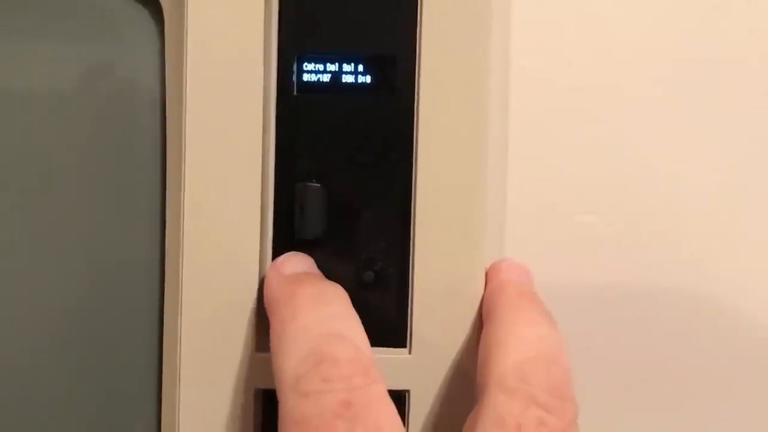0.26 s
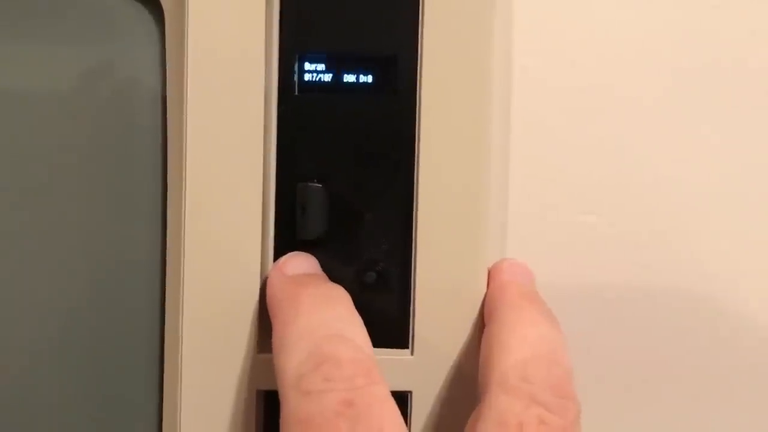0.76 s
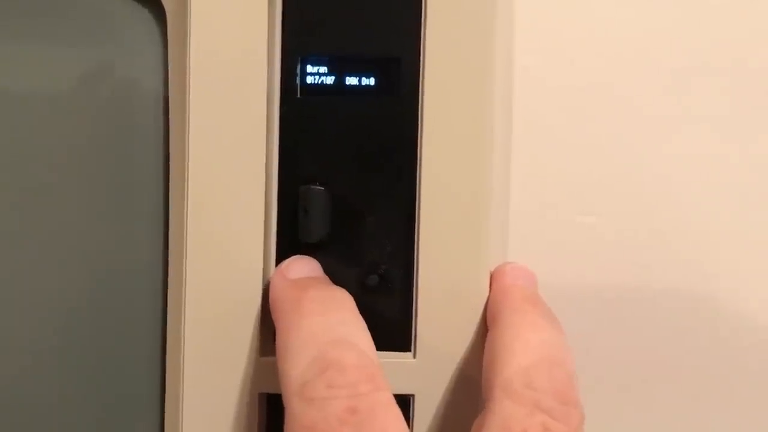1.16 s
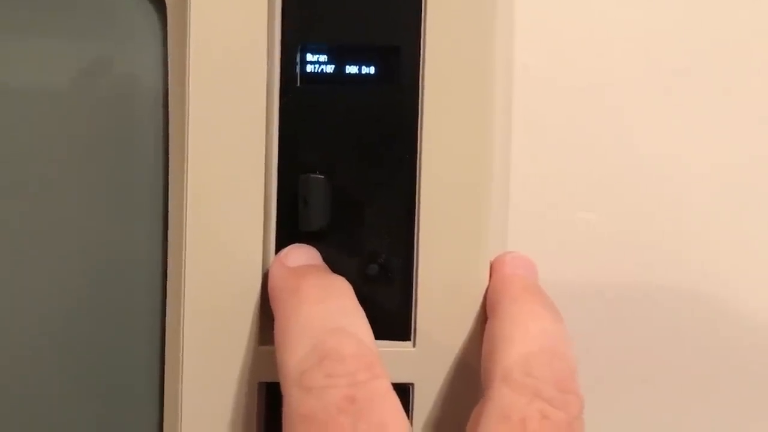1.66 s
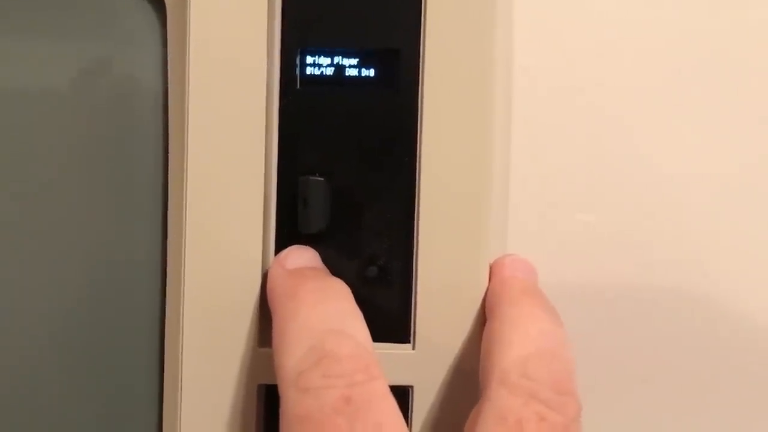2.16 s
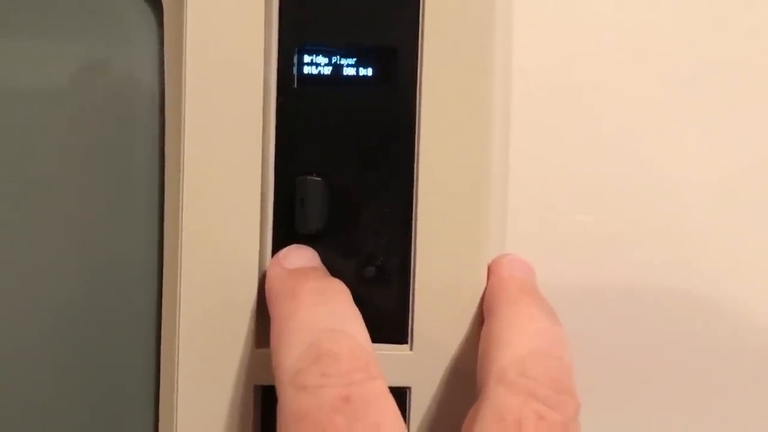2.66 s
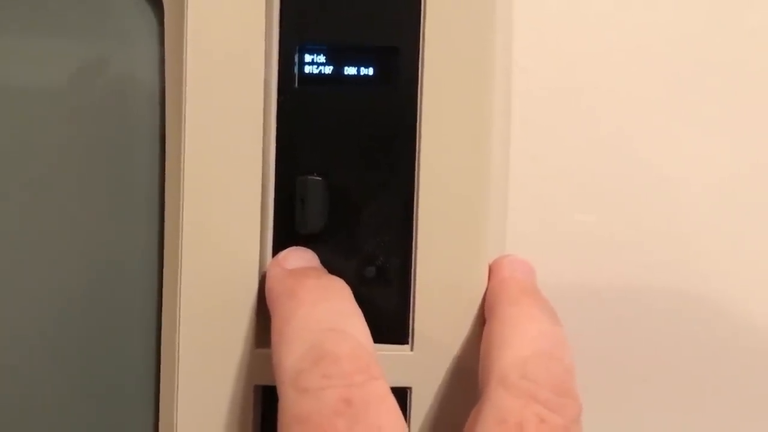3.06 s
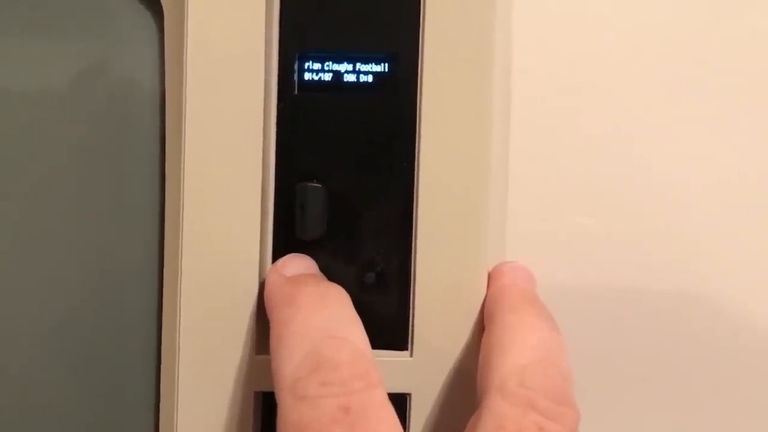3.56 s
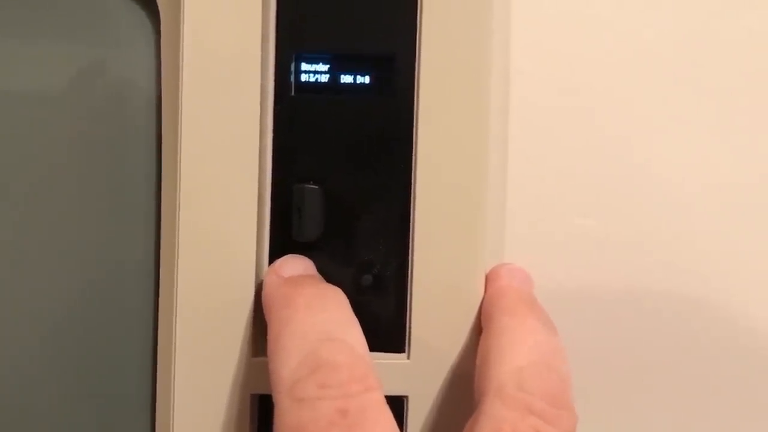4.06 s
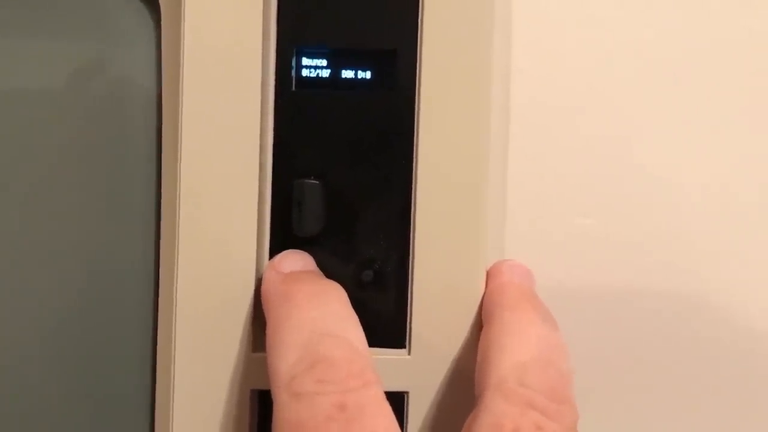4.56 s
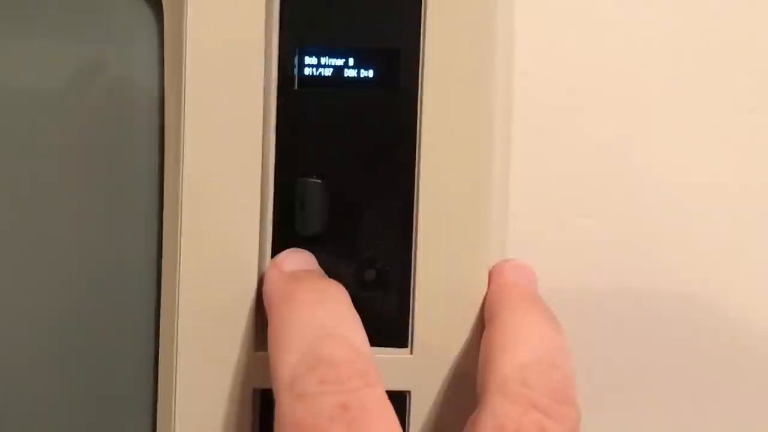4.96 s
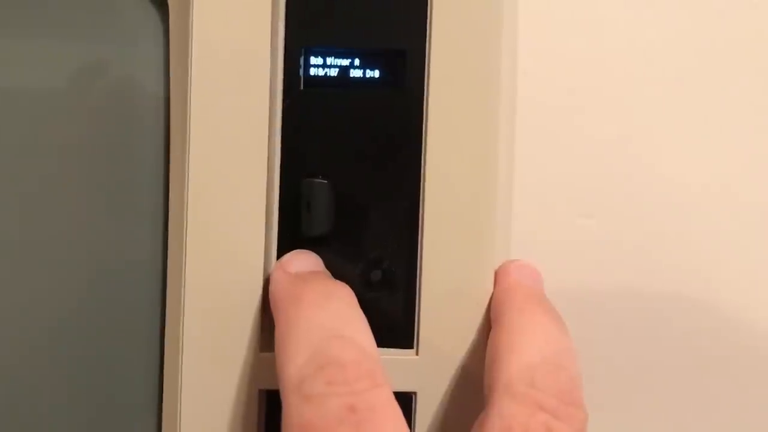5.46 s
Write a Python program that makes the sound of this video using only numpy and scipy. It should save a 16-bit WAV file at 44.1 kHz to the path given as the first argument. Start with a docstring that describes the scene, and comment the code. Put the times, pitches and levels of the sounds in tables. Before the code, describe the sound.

A finger presses a small plastic push button on a computer drive panel about eleven times at a slightly uneven pace. Each press is a crisp snap with a short knock from the plastic case, and most are followed at once by a duller release click. The button is close to the microphone in a small room. A low hum, soft hiss and a picture tube's thin, very high whistle continue throughout.

```python
"""A small plastic push button on a drive panel clicks close up as a finger steps through a menu.
Each press and release snaps the switch and rings the plastic case; a small room answers.
Behind it sit a low hum, a soft hiss and the thin line whistle of a picture tube."""
import sys
import numpy as np
from scipy import signal
from scipy.fft import rfft, irfft
from scipy.io import wavfile
from scipy.ndimage import uniform_filter1d

SR = 44100
rng = np.random.default_rng(int(sys.argv[2]) if len(sys.argv) > 2 else 0)


def transcribe(u):
    """Save the signal u as a 16-bit wav file named by the first command-line argument.

    u: samples, shape (n,) or (channels, n), limited to [-1, 1]; the rate is SR.
    q: integer samples, one column per channel.
    """
    v = np.clip(np.atleast_2d(u).T, -1, 1)
    q = np.round(v * 32767).astype(np.int16)
    wavfile.write(sys.argv[1], SR, q)


N = 251811
T = np.arange(N) / SR


def undb(db):
    """Decibels to gain."""
    return 10 ** (np.asarray(db) / 20)


def unit(x):
    """Scale to rms 1."""
    return x / np.sqrt(np.mean(x ** 2))


def equalise(x, curve):
    """Minimum-phase EQ through (frequency [Hz], gain [dB]) points."""
    size = 8192
    hz, db = np.transpose(curve)
    log_hz = np.log(np.fft.rfftfreq(size, 1 / SR) + 1)
    log_gain = np.log(undb(np.interp(log_hz, np.log(hz), db)))
    cepstrum = irfft(log_gain)[:size // 2]
    cepstrum[0] /= 2
    impulse = irfft(np.exp(rfft(2 * cepstrum, size)))
    return signal.fftconvolve(x, impulse)[:len(x)]


def wander(rate_hz):
    """Random modulator: sample and hold, smoothed twice, at rms 1."""
    hold = int(SR / rate_hz)
    steps = np.repeat(rng.standard_normal(N // hold + 1), hold)
    return unit(uniform_filter1d(uniform_filter1d(steps, hold), hold)[:N])


def bump(at_s, width_s):
    """A smooth rise to 1 and fall around a moment."""
    return np.exp(-((T - at_s) / width_s) ** 2)


def decay(t, t60):
    """Exponential decay, 60 dB in t60 seconds."""
    return np.exp(-np.log(1000) * t / t60)


def ring(t, hz, t60, db):
    """Struck modes; neighbours swing in opposite senses, so the sound swells over its first cycles."""
    t = np.maximum(t, 0)[:, None]
    gains = undb(db) * (-1) ** np.arange(len(hz))
    return (np.sin(2 * np.pi * hz * t) * decay(t, t60)) @ gains


def drifting_tone(hz, db, drift_rad=0.32):
    """A sine whose phase wanders gently."""
    return np.sqrt(2) * undb(db) * np.sin(2 * np.pi * hz * T + drift_rad * wander(4.7))


# Colour of the noise floor: (frequency [Hz], gain [dB])
HISS_EQ = [(100, -11.5), (240, 6), (330, 1.5), (500, -3.5), (1000, -2.5), (1500, -7.5), (2300, -16.5),
           (3200, -12), (5500, -18.5), (9400, -21.5), (12500, -17), (14000, -38)]


def hiss(level_db=-54, waver_db=0.16):
    """A soft, nearly even bed of noise."""
    noise = unit(equalise(rng.standard_normal(N), HISS_EQ))
    return noise * undb(level_db - waver_db * wander(3.2))


# Colour of the low hum: (frequency [Hz], gain [dB])
RUMBLE_EQ = [(22, -34.5), (38, -22.5), (58, -2), (70, -7), (83, 2.5), (98, -10.5), (118, -4.5), (138, -5.5),
             (170, -9), (200, -22), (300, -37.5), (900, -87)]


def rumble(level_db=-43.5, swell_db=3):
    """A low, noisy hum with one broad, shallow swell."""
    noise = unit(equalise(rng.standard_normal(N), RUMBLE_EQ))
    return noise * undb(level_db + swell_db * bump(at_s=1.08, width_s=0.53))


# The drive's hum, then two faint partners of the tube's whistle: (frequency [Hz], level [dB])
STEADY_TONES = [(83, -53.5), (7825, -77.5), (11725, -68)]


def steady_tones():
    """The drive hums and the tube whines faintly, each tone wavering by about a decibel."""
    return sum(drifting_tone(hz, db + wander(3.75)) for hz, db in STEADY_TONES)


# Moments when the whistle ducks and comes back: (time [s], half width [s], depth [dB])
WHISTLE_DUCKS = [(1.75, 1, 2.5), (3.62, 0.19, 5), (4.1, 0.18, 8)]


def tube_whistle(line_hz=15625, level_db=-40, flutter_db=1.1):
    """The picture tube whistles at its line rate, with a slight flutter."""
    duck_db = sum(depth * bump(at_s, width_s) for at_s, width_s, depth in WHISTLE_DUCKS)
    return drifting_tone(line_hz, level_db + flutter_db * wander(30) - duck_db)


# Colour of the room's reflections: (frequency [Hz], gain [dB])
ROOM_EQ = [(120, -19), (245, -1), (320, 0), (430, -9), (560, -3.5), (720, -2.5), (1100, -6.5), (1600, -6.5),
           (3500, -6.5), (7000, -4.5), (10000, -8.5), (15000, -10)]


def room(x, wet_db=-9, early_t60=0.12, late_t60=0.35, late_db=-9, wall_hz=3500):
    """Dense reflections from the desk and nearby gear, then the fainter, duller tail of the walls."""
    t, predelay_s, build_s = T[:SR // 2], 0.009, 0.008
    build = 1 - np.exp(-np.maximum(t - predelay_s, 0) / build_s)
    diffuse = rng.standard_normal(len(t)) * build
    dull = signal.sosfilt(signal.butter(1, wall_hz, fs=SR, output="sos"), diffuse)
    echoes = diffuse * decay(t, early_t60) + undb(late_db) * dull * decay(t, late_t60)
    echoes = equalise(echoes / np.linalg.norm(echoes), ROOM_EQ)
    return undb(wet_db) * signal.fftconvolve(x, echoes)[:N]


# Bending modes of the plastic case: (frequency [Hz], t60 [s], press level [dB], release level [dB])
CASE_MODES = [(240.3, 0.087, -28.5, -29), (396.2, 0.052, -23.5, -24), (443.2, 0.038, -14, -14.5),
              (535, 0.016, -10, -10), (646.6, 0.019, -16.5, -15), (779, 0.11, -38, -35.5),
              (875, 0.038, -27, -24.5), (1035, 0.049, -36, -31), (1132, 0.045, -34.5, -30),
              (1495, 0.008, -25.5, -23), (1457, 0.067, -38.5, -38.5), (1590, 0.091, -43.5, -44.5),
              (1880, 0.048, -37, -35), (2060, 0.016, -34.5, -37), (2570, 0.037, -44.5, -42),
              (2872, 0.044, -43.5, -43), (3320, 0.04, -45.5, -37.5), (3653, 0.032, -50.5, -39.5)]


def case_knock(t, mode_db, force_db, corner_hz=1000):
    """The body of the click: the case rings, brighter when a harder stroke shortens the contact."""
    hz, t60 = np.transpose(CASE_MODES)[:2]
    tilt_db = force_db * np.log2(np.maximum(hz / corner_hz, 1))
    # each touch shifts the modes' pitch and level a little, the high ones most
    pitch_shift, level_shift = rng.standard_normal((2, len(hz))) * hz / 1000
    return ring(t, hz * (1 + 0.004 * pitch_shift), t60, mode_db + tilt_db + 0.6 * level_shift)


# Resonances of the switch and its cap: (frequency [Hz], t60 [s], level [dB])
SWITCH_MODES = [(3900, 0.037, -9.5), (4780, 0.025, -9.5), (5670, 0.015, -2), (6060, 0.034, -9),
                (7200, .02, -14), (8400, .018, -29), (9100, 0.022, -10), (9830, 0.027, -7),
                (11070, 0.0036, 17.5), (11480, 0.0053, 7), (12540, 0.0044, 8.5)]
# Colour of the contact crackle: (frequency [Hz], gain [dB])
CRACKLE_EQ = [(300, -19), (1500, -8.5), (3400, -4), (5700, -4.5), (7600, -7), (9600, -3.5), (11200, -12.5),
              (13200, -7), (14300, -25), (16500, -51)]


def switch_snap(t, chatter_db, chatter_t60, crack_db=13, crack_t60=0.0025, scatter_db=2):
    """The bright edge of the click: the contact cracks, the switch rings and the loose cap chatters."""
    hz, t60, db = np.transpose(SWITCH_MODES)
    modes = ring(t, hz, t60, db + scatter_db * rng.standard_normal(len(hz)))
    age = np.maximum(t, 0)
    crack = undb(crack_db) * decay(age, crack_t60)
    chatter = undb(chatter_db) * decay(age, chatter_t60)
    crackle = (t > 0) * (crack + chatter) * rng.standard_normal(len(t))
    return modes + equalise(crackle, CRACKLE_EQ)


def clicks(strokes, mode_db, knock_db, knock_follow, snap_db, chatter_db, chatter_t60):
    """Each stroke layers a knock of the case with the snap of the switch just behind it."""
    track, t, snap_lag_s = np.zeros(N + SR), T[:SR // 8], 0.0006
    for at_s, force_db in strokes:
        # the snap follows the finger's force fully; the knock, mostly set by the spring, only in part
        push_db = knock_follow * force_db
        knock = undb(knock_db + push_db) * case_knock(t, mode_db, push_db)
        snap = undb(snap_db + force_db) * switch_snap(t - snap_lag_s, chatter_db, chatter_t60)
        start = int(at_s * SR)
        track[start:start + len(t)] += knock + snap
    return track[:N]


# The switch snaps down: (time [s], force above the usual stroke [dB])
PRESS_CUES = [(0.034, -1.5), (0.38, -1.5), (0.702, 0.5), (1.06, -0.5), (2.04, 4), (2.62, 1), (3.155, 1.5),
              (3.702, -2.5), (4.247, 1), (4.771, 1.5), (5.317, 0)]
# The switch springs back: (time [s], force above the usual stroke [dB])
RELEASE_CUES = [(0.481, 6), (0.804, -6), (1.157, -5), (2.738, 5), (3.813, 6.5), (4.358, -2.5), (4.886, 1.5),
                (5.421, -10)]
# The cap ticks with hardly any knock: (time [s], force above the usual stroke [dB])
TICK_CUES = [(0.16, -6.5), (2.165, 6.5)]


def button(tick_rolloff_db_per_octave=4):
    """Presses are crisp, releases duller, and a gently lifted finger leaves only a tick."""
    hz, _, press_db, release_db = np.transpose(CASE_MODES)
    # a gentle touch hardly wakes the lowest and highest modes of the case
    tick_db = release_db - tick_rolloff_db_per_octave * np.abs(np.log2(hz / 900))
    presses = clicks(PRESS_CUES, press_db, knock_db=0, knock_follow=0.37,
                     snap_db=-35.5, chatter_db=5.5, chatter_t60=0.048)
    releases = clicks(RELEASE_CUES, release_db, knock_db=0.62, knock_follow=0.097,
                      snap_db=-45.5, chatter_db=14.5, chatter_t60=0.037)
    ticks = clicks(TICK_CUES, tick_db, knock_db=-15, knock_follow=0.16,
                   snap_db=-39.5, chatter_db=14, chatter_t60=0.03)
    return presses + releases + ticks


def scene():
    """The close button and its room, over a bed of hum, hiss and whistle, in mono."""
    close = button()
    return (close + room(close) + rumble() + hiss() + steady_tones() + tube_whistle())[None]


# Narrow dips and a peak in the microphone's treble: (frequency [Hz], gain [dB])
MIC_EQ = [(3900, -0.5), (4350, -5), (4800, 0.5), (9700, 0), (10300, -8), (11000, -5.5), (11900, 4.5),
          (12350, -9), (12900, -0.5)]


def record(dry, top_hz=16600):
    """The microphone colours the treble and a steep low-pass cuts the top."""
    lowpass = signal.ellip(8, 0.1, 80, top_hz, fs=SR, output="sos")
    return signal.sosfilt(lowpass, equalise(dry[0], MIC_EQ))[None]


dry = scene()
out = record(dry)
transcribe(out)
```